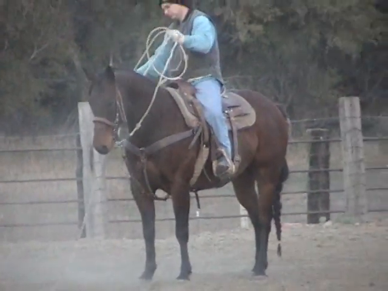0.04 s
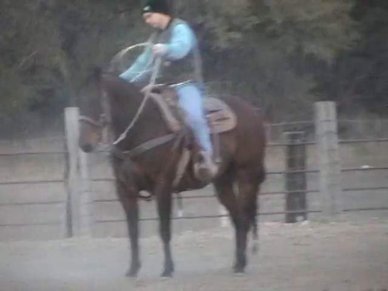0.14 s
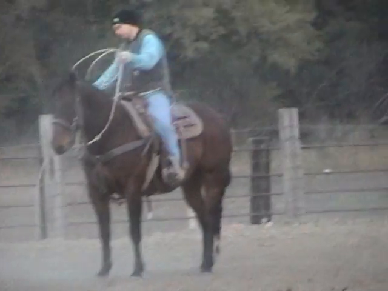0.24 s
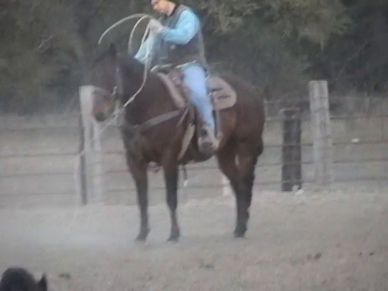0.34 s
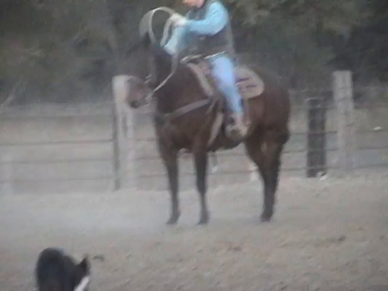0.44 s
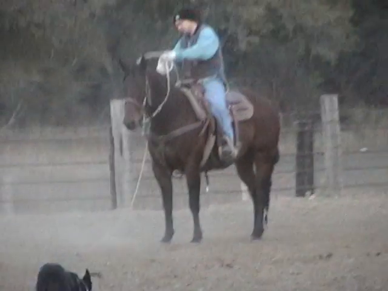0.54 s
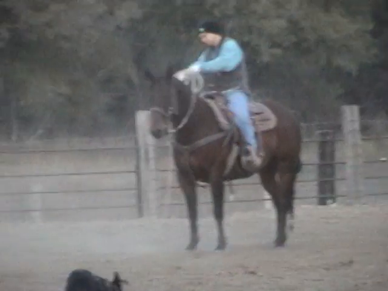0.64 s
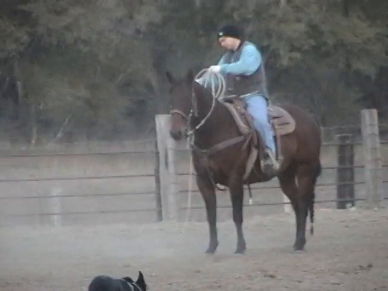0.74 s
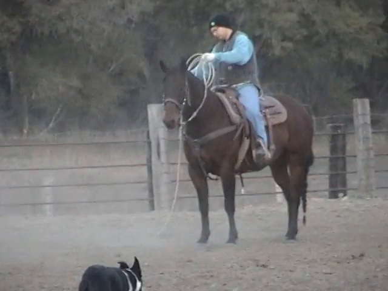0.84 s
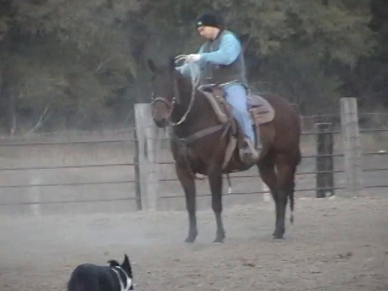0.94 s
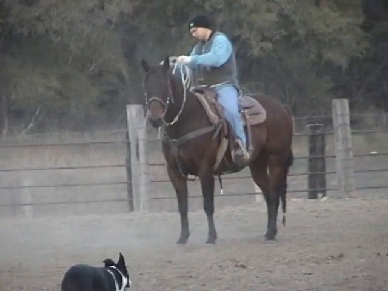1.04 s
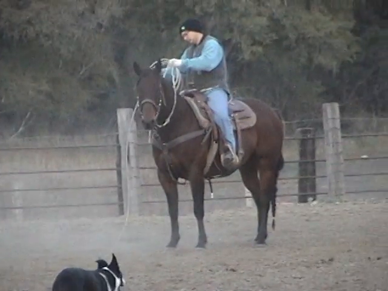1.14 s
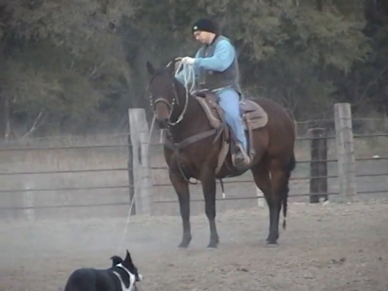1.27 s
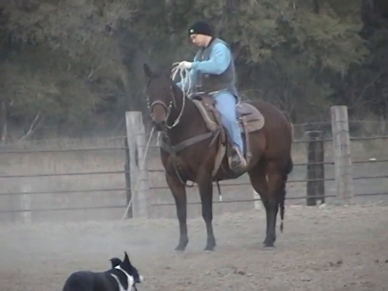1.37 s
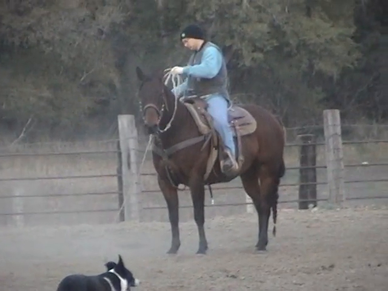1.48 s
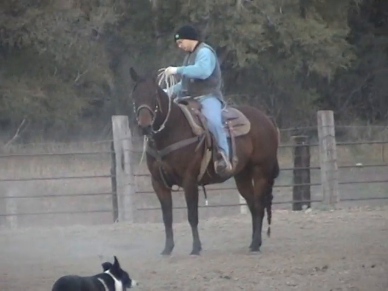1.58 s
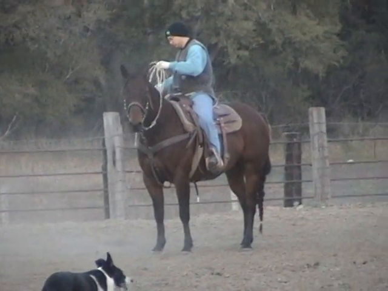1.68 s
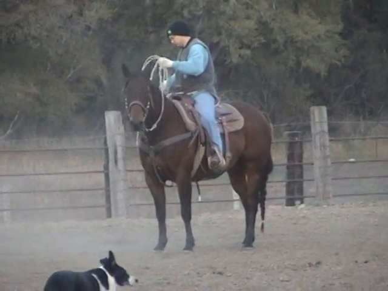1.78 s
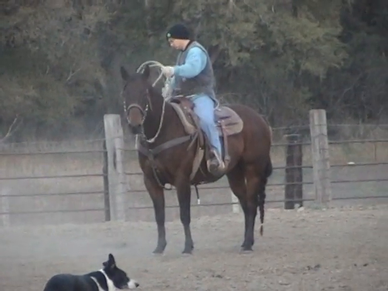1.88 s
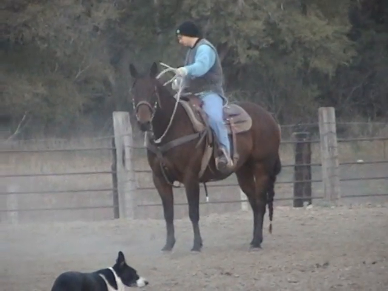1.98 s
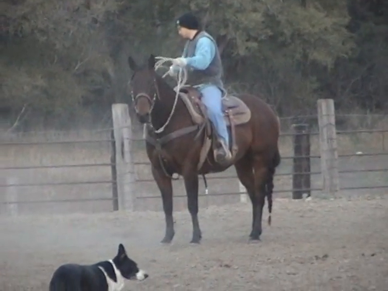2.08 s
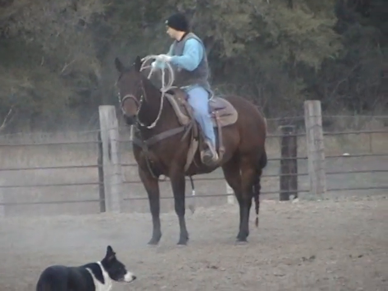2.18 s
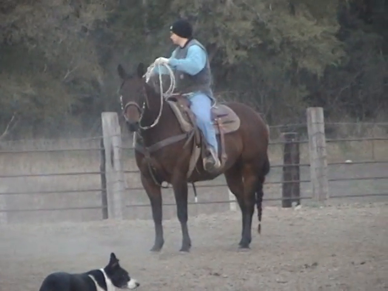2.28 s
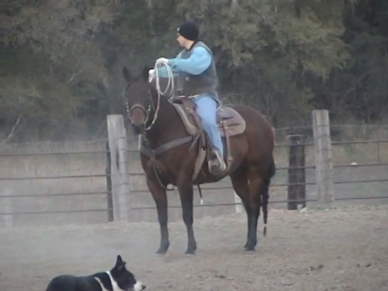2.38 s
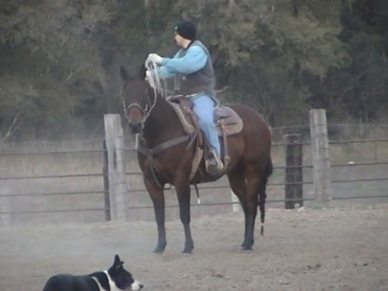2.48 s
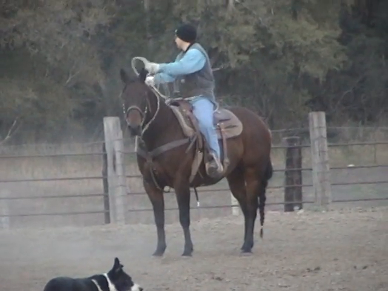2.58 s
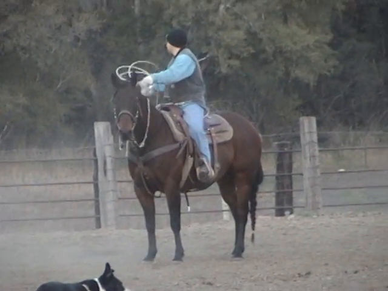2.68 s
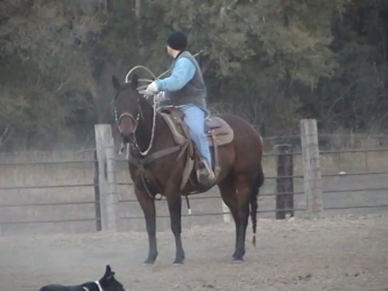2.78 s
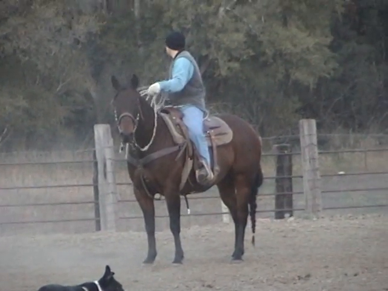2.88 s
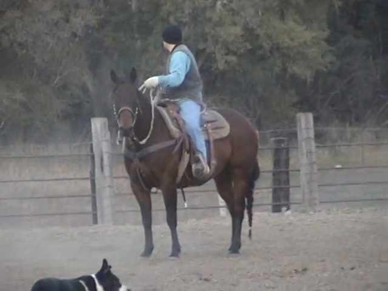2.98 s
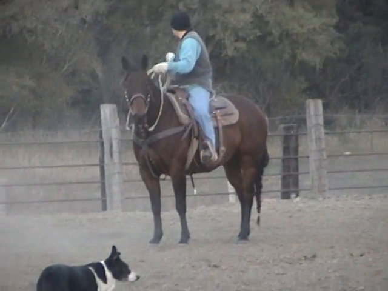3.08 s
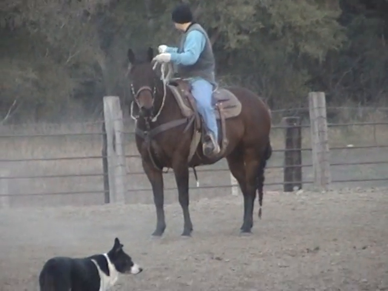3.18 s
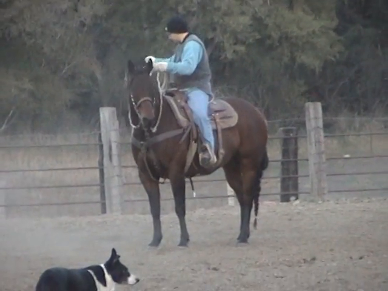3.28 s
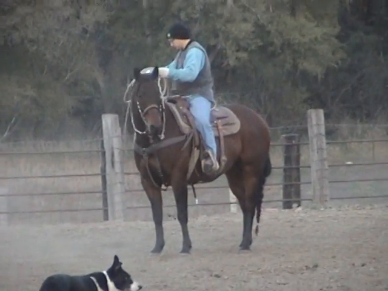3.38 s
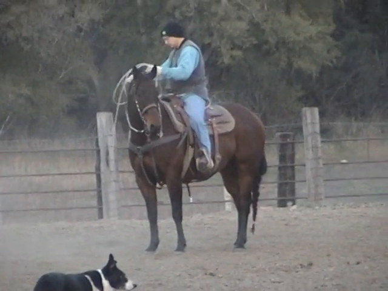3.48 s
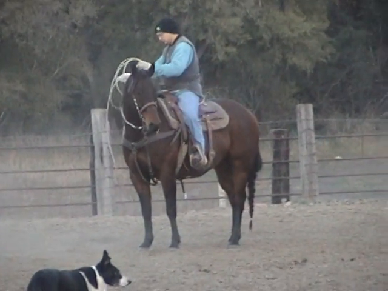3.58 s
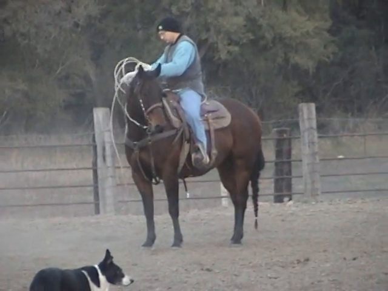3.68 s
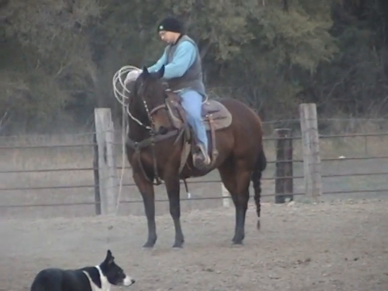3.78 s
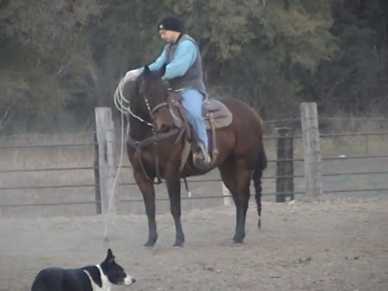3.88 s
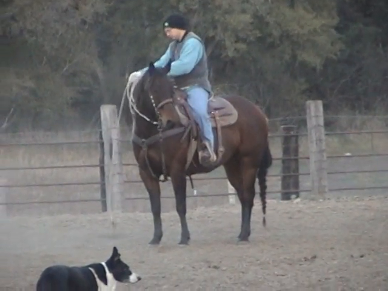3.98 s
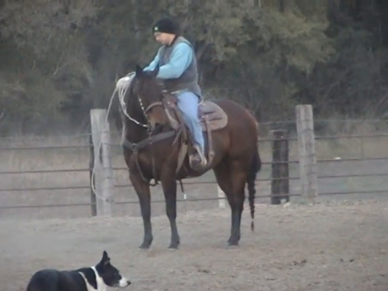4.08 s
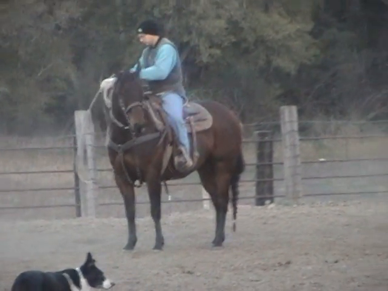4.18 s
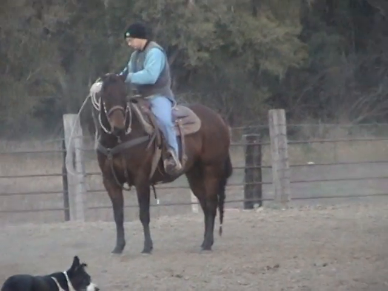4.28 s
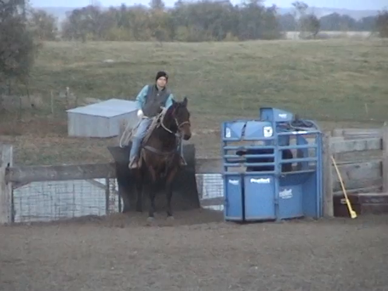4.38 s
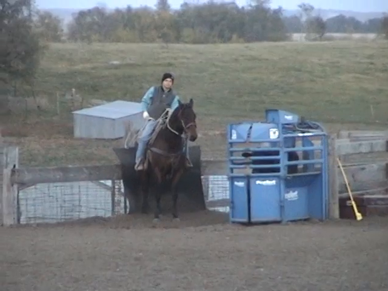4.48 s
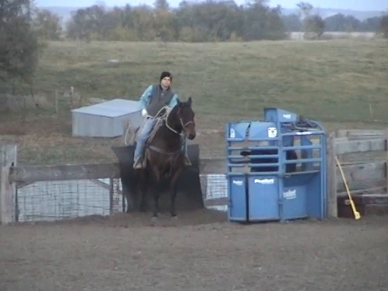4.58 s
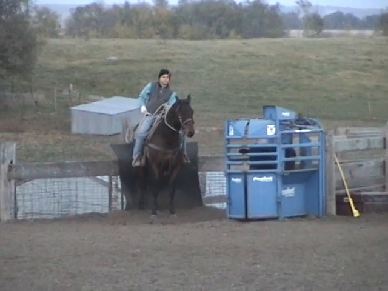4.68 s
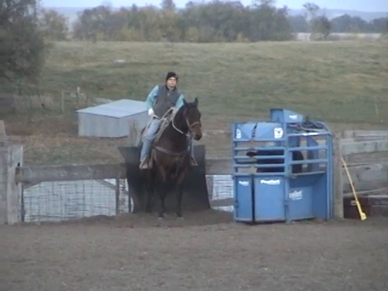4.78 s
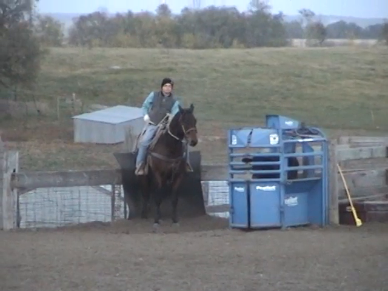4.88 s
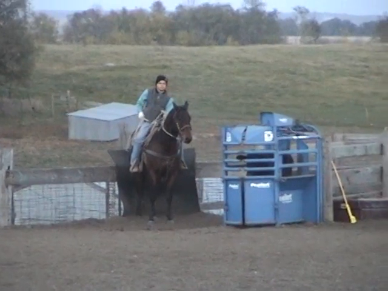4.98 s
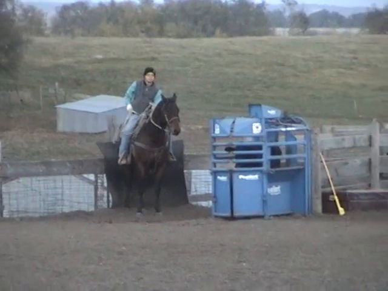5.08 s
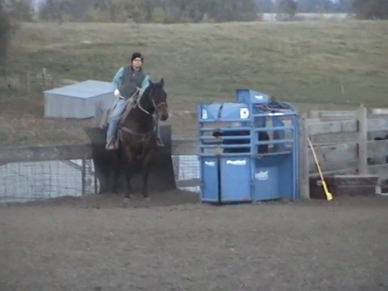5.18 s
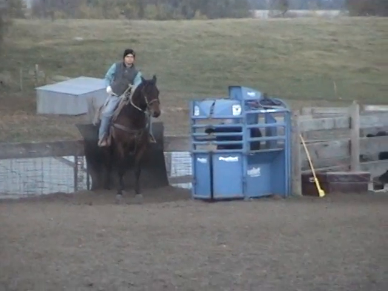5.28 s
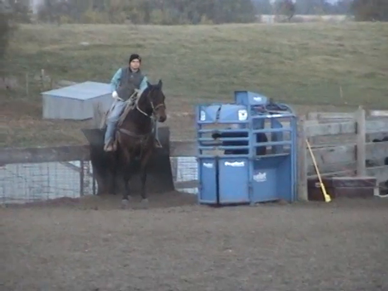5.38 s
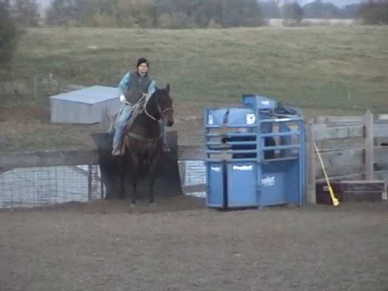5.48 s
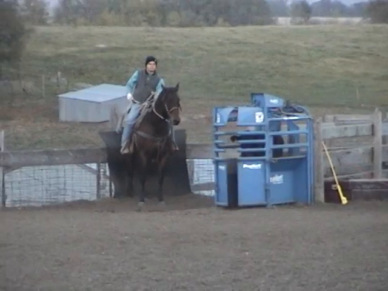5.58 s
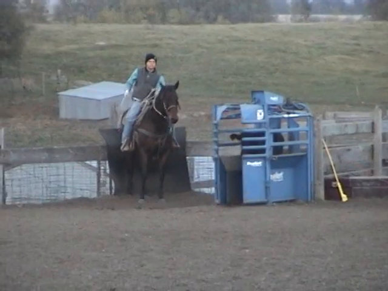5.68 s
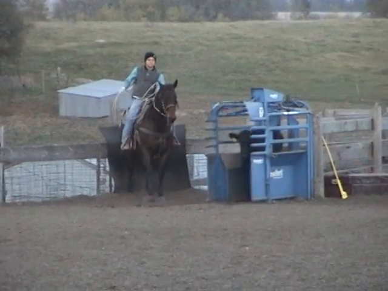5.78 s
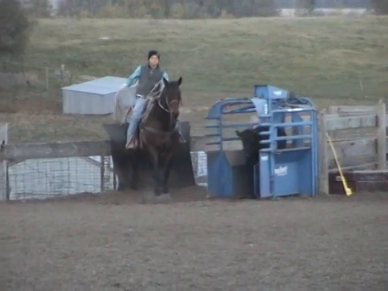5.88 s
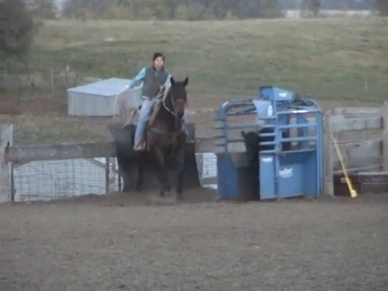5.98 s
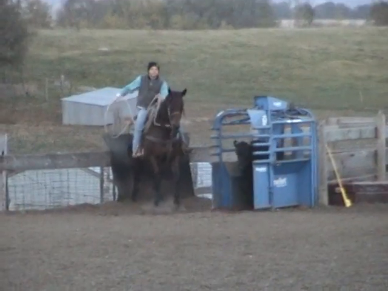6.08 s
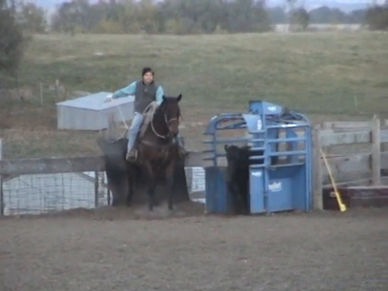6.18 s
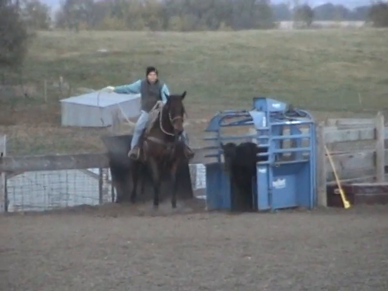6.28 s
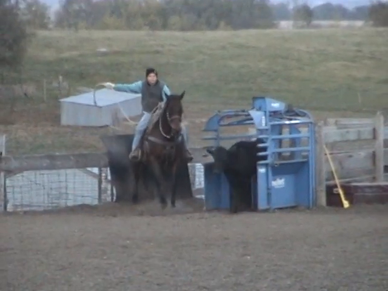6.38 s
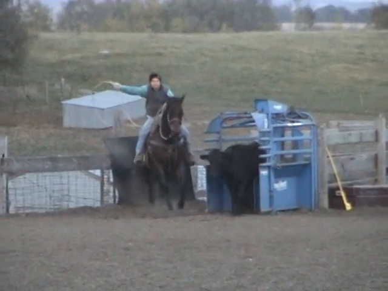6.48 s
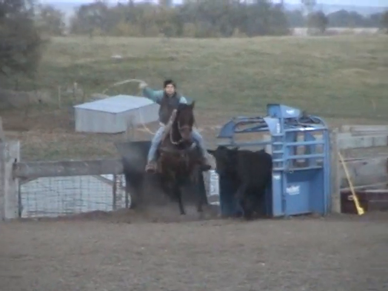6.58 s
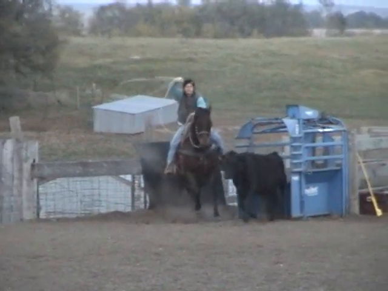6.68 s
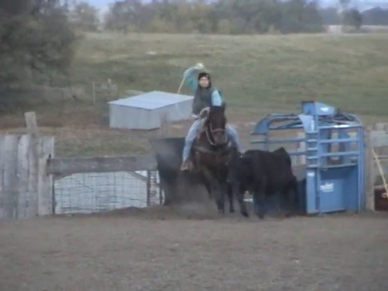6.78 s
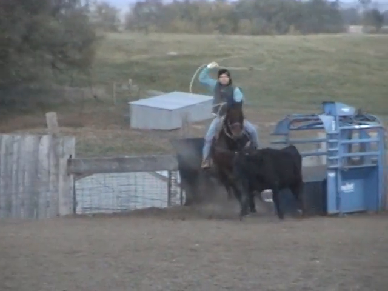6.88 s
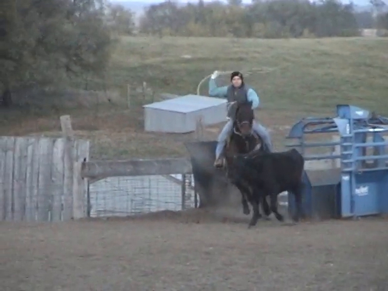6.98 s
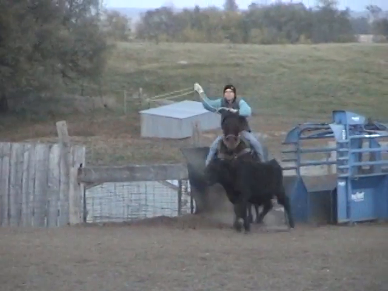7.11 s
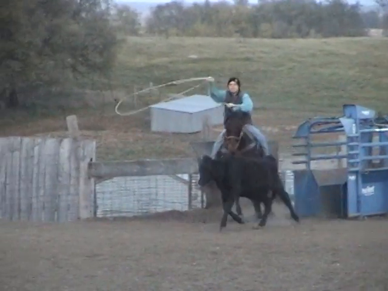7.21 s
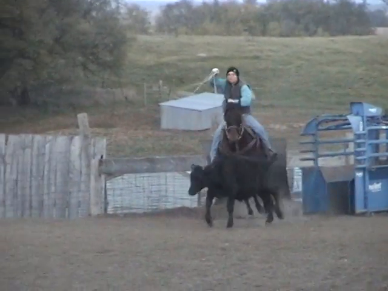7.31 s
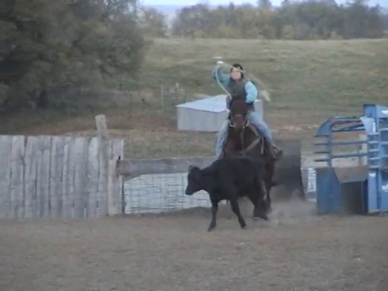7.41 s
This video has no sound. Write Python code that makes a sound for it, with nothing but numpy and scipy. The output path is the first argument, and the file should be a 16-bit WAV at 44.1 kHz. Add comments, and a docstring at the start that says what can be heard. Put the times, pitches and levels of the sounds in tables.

```python
"""First the whine and hiss of a tape camcorder's drive, close in both of its microphones, then hands on its body.
The place is a riding pen: across it a steel cattle chute bangs, rattles and booms, with light wind behind.
Blows shake noise through steel and panel resonances; knocks ring the camera's shell modes. The drive is paired
beating bearing tones plus hiss that partly repeats; both switch colour at the cut to a second shot.
"""
import sys
import numpy as np
from scipy import signal
from scipy.fft import rfft, irfft, next_fast_len
from scipy.io import wavfile
from scipy.ndimage import map_coordinates

SR = 44100
rng = np.random.default_rng(int(sys.argv[2]) if len(sys.argv) > 2 else 0)


def to_wav(sig):
    """Store sig (one row per channel, or 1-D mono) as 16-bit WAV at the path in sys.argv[1].

    Samples outside -1..1 are clipped; the rate is SR.
    """
    pcm = np.clip(np.atleast_2d(sig), -1, 1) * 32767
    pcm = np.round(pcm).astype(np.int16)
    wavfile.write(sys.argv[1], SR, pcm.T)  # frames by channels


N = 328545
TIME = np.arange(N) / SR
TOP_HZ = 15600  # band limit of the camera


def amp(db):
    """Decibels to amplitude."""
    return 10 ** (np.asarray(db) / 20)


def unit(x):
    """Scale to rms 1."""
    return x / np.sqrt(np.mean(x ** 2) + 1e-20)


def along(points, hz):
    """Read (f/Hz, value) points along a log frequency axis."""
    f, v = np.transpose(points)
    return np.interp(np.log(hz + 1), np.log(f + 1), v)


def curves(rows):
    """One value per sample for each column after the time."""
    s, *cols = np.transpose(rows)
    return [np.interp(TIME, s, c) for c in cols]


def wobble(rate):
    """A smooth random curve with rate knots a second."""
    knots = rng.standard_normal(int(N * rate / SR) + 4)
    return map_coordinates(knots, [TIME * rate])


def filtered(x, response):
    """Pass x through a complex response of frequency."""
    m = next_fast_len(N + SR // 2)
    return irfft(rfft(x, m) * response(np.fft.rfftfreq(m, 1 / SR)), m)[..., :N]


def resonant(modes):
    """The causal response of (f/Hz, width/Hz, level/dB) resonances with alternating signs."""
    def response(f):
        return sum((-1) ** k * amp(db) * 1j * f * width / (centre ** 2 - f * f + 1j * f * width)
                   for k, (centre, width, db) in enumerate(modes))
    return response


def spread(pair, colour, alike, lean):
    """Mix two unrelated signals into a coloured stereo pair of rms 1 with a set left-right likeness."""
    m = next_fast_len(N + SR // 2)
    hz, (a, b) = np.fft.rfftfreq(m, 1 / SR), rfft(pair, m)
    turn = np.arccos(np.clip(along(alike, hz), -1, 1)) / 2
    mid, side = np.cos(turn) * a, np.sin(turn) * b
    tilt = colour(hz) * amp(along(lean, hz) * np.array([[.5], [-.5]]))
    return unit(irfft(np.array([mid + side, mid - side]) * tilt, m)[:, :N])


def dying(s, db, t60, attack):
    """An envelope rising from s with time constant attack and falling 60 dB in t60, cut after 2 s."""
    out, start = np.zeros(N), round(s * SR)
    t = TIME[:min(N - start, 2 * SR)]
    out[start:start + len(t)] = amp(db - 60 * t / t60) * (1 - np.exp(-t / attack))
    return out


# blows of the gate and bars across the pen; from 7.2 s a faint bright swell, perhaps a creak:
# t/s, steel level/dB, treble level/dB, boom level/dB
BLOWS = [(5.596, -53, -35, -45), (5.621, -41, -54, -40.5), (5.646, -34, -31, -45), (5.658, -27, -33.5, -41),
         (5.689, -33, -35, -54), (5.751, -37, -48, -47), (5.993, -22.5, -27, -34.5),
         (6.03, -29, -29.5, -24), (6.047, -21.5, -22, -37), (6.094, -24.5, -24, -25),
         (6.122, -33, -26.5, -47), (6.157, -28, -27.5, -50), (6.209, -30.5, -32, -40),
         (6.269, -36, -36, -44), (6.327, -35, -42.5, -82), (6.487, -36, -40.5, -42),
         (6.528, -33, -39.5, -46), (6.586, -31.5, -34.5, -31.5), (6.542, -32.5, -39, -38),
         (6.604, -36, -33.5, -50), (6.711, -35.5, -43, -54), (6.779, -47, -51, -44), (7.234, -63, -47, -49),
         (7.29, -71, -48, -57), (7.37, -56, -56, -49)]
# left-right likeness of the chute at the two microphones: f/Hz, likeness
CHUTE_ALIKE = [(60, 0.99), (130, 1), (290, 0.99), (640, 1), (1410, 0.89), (3100, 0.98), (6820, 0.99),
               (15000, 0.77)]
# left over right microphone for the chute: f/Hz, level/dB
CHUTE_LEAN = [(60, 9), (110, 2.5), (200, 4.5), (380, 3), (700, 2.5), (1290, 2), (2380, 0.5), (4400, 0),
              (8120, 1), (15000, 2)]


def chute():
    """Each blow rings the steel, sets loose bars rattling, booms in the side panels and sounds the bars' notes."""
    return rattle() + boom() + pin() + clang()


# rattle as it arrives at the camera: f/Hz, level/dB per Hz
STEEL = [(280, -26), (480, -10.5), (742, -0.5), (1130, -4), (1560, 0), (1770, -4.5), (3040, -1.5),
         (4900, -7), (6190, -6.5), (8150, -12.5), (9990, -27), (11400, -29.5), (15400, -62)]
# resonances of the steel bars: f/Hz, width/Hz, note level/dB (before a chance strength)
BARS = [(1060, 230, 0), (1564, 39, 0), (2990, 8.8, -2), (4220, 19, -6), (6170, 100, -7), (5900, 33, -6),
        (7400, 69, -12), (7430, 250, -13), (7560, 80, -13)]
RING_T60, TREBLE_T60, CRACK_T60, CRACK_DB = 0.12, 0.33, 0.02, 0  # s, s, s, dB: first ring, crack of contact
RATTLE_DB, RATTLE_T60, RATTLE_TREBLE_T60, RATTLE_RISE_S = -5.5, 0.73, 0.39, 0.013  # loose bars shake on
GRAIN_DB, CLUMP_DB = 1.2, .7  # weights of the small contacts' unevenness, fast and in clumps


def rattle():
    """Dense small contacts, as noise, ring the steel; powers of all blows add."""
    body, edge = np.zeros((2, N))
    for s, db, treble_db, _ in BLOWS:
        body += dying(s, db, RING_T60, attack=0.00028) ** 2
        body += dying(s, db + RATTLE_DB, RATTLE_T60, RATTLE_RISE_S) ** 2
        edge += dying(s, treble_db, TREBLE_T60, attack=0.0034) ** 2
        edge += dying(s, treble_db + CRACK_DB, CRACK_T60, attack=0.0018) ** 2
        edge += dying(s, treble_db + RATTLE_DB, RATTLE_TREBLE_T60, RATTLE_RISE_S) ** 2
    unevenness = amp(GRAIN_DB * wobble(300) + CLUMP_DB * wobble(60))
    contacts = rng.standard_normal((2, 2, N)) * unevenness
    bars = resonant([(centre, width, 0) for centre, width, _ in BARS])
    steel = lambda hz: amp(along(STEEL, hz)) * (1 + bars(hz))
    upper = lambda hz: 1 / np.sqrt(1 + (2300 / (hz + 1)) ** 6)  # splits steel from treble
    low = spread(contacts[0], lambda hz: steel(hz) * np.sqrt(1 - upper(hz) ** 2), CHUTE_ALIKE, CHUTE_LEAN)
    high = spread(contacts[1], lambda hz: steel(hz) * upper(hz), CHUTE_ALIKE, CHUTE_LEAN)
    return np.sqrt(body) * low + np.sqrt(edge) * high


# side panels, largest first; the summed response is then squared: f/Hz, width/Hz, level/dB (before squaring)
PANELS = [(85, 38, -6), (126, 17, -1), (159, 48, -5), (216, 19.2, -1.5), (233.6, 8.1, 1.5),
          (270.4, 44, -5.5), (345, 83, -10)]
BOOM_T60, BOOM_RISE_S = 1.29, 0.055  # the panels answer slowly
THUD_DB, THUD_T60 = 0, 0.26  # the panels' first jolt
DEEP_DB, DEEP_T60, DEEP_RISE_S = -8, 1.62, 0.014  # the two largest panels hum on longer


def boom():
    """Noise through the panel resonances swells slowly after each blow's thud and hums on."""
    swell, deep = np.zeros((2, N))
    for s, _, _, boom_db in BLOWS:
        swell += dying(s, boom_db, BOOM_T60, BOOM_RISE_S) ** 2
        swell += dying(s, boom_db + THUD_DB, THUD_T60, attack=.003) ** 2
        deep += dying(s, boom_db + DEEP_DB, DEEP_T60, DEEP_RISE_S) ** 2
    large, panels = (spread(rng.standard_normal((2, N)), lambda hz: resonant(modes)(hz) ** 2,
                            CHUTE_ALIKE, CHUTE_LEAN)
                     for modes in np.split(PANELS, [2]))
    return np.sqrt(swell) * panels + np.sqrt(deep) * large


# clinks of a loose pin: t/s, level/dB, t60/s
CLINKS = [(6.501, -26, 0.018), (7.238, -52, 0.041)]
PIN_HZ = 4400


def pin():
    """A loose pin clinks as a short tone of unsteady phase, equal in both microphones."""
    return sum(dying(s, db, t60, attack=0.00044) * np.sin(2 * np.pi * PIN_HZ * TIME + wobble(300))
               for s, db, t60 in CLINKS)


CLANG_DB = -7.5  # the bars' own notes under each blow


def clang():
    """Every blow sounds the bars' notes anew as decaying sines, each at a chance strength."""
    out, t = np.zeros(N + SR), TIME[:SR // 5]
    hz, width, level_db = np.transpose(BARS)[:, :, None]
    chances = rng.standard_normal((len(BLOWS), len(BARS), 1))
    for (s, db, _, _), chance in zip(BLOWS, chances):
        notes = amp(level_db + 3 * chance) * np.exp(-np.pi * width * t) * np.sin(2 * np.pi * hz * t)
        out[round(s * SR):][:len(t)] += amp(db + CLANG_DB) * notes.sum(axis=0) * (1 - np.exp(-t / 0.0021))
    return out[:N] * amp([[.5], [-.5]])  # left a little louder


# hands on the camera body, at the microphones: t/s, level/dB, thump level/dB re knock, tick level/dB re knock,
# f/Hz favoured by the spot struck, share felt oppositely by the two microphones
KNOCKS = [(.157, -33.5, -32, -17, 596, .9), (.17, -33.5, -32, -17, 794, .9),
          (0.185, -34, -32, -13, 1500, .9), (0.247, -41, -30, -30, 452, 0.6),
          (0.403, -27.5, -30, -14, 388, 0.75), (0.407, -22.5, -32, -10, 730, .9),
          (0.427, -26, -25, -8, 1300, 0.94), (0.432, -19, -26, -19, 705, 1),
          (0.451, -31.5, -20, -23, 450, 0.54), (0.48, -37.5, -22, -23, 273, 0.43),
          (.655, -24.5, -42, -15, 860, 0.79), (0.799, -35, -7, -33, 300, .1),
          (1.5, -41.5, -9, -33, 220, .1), (1.543, -34, -17, -33, 450, .1),
          (4.218, -35, -28, -23, 700, 0.82)]
# modes of the camera shell: f/Hz, width/Hz
SHELL = [(190, 58), (300, 88), (430, 146), (560, 136), (760, 270), (1000, 280), (1250, 210), (1900, 240)]
SCUFF_DB, SCUFF_T60, SCUFF_HZ = -23.5, 0.12, 500  # the hand slides on, the longer the lower the spot sounds


def knocks():
    """A touch rings the shell modes near its spot and scuffs on; it also pushes the microphones and may tick."""
    shell, tick, t = np.zeros((2, N)), np.zeros(N), TIME[:SR // 5]
    hz, width = np.transpose(SHELL)[:, :, None]
    sign = (-1) ** np.arange(len(SHELL))[:, None]  # neighbouring modes swing oppositely
    for s, db, thump_db, tick_db, spot_hz, opposed in KNOCKS:
        scuff_db = SCUFF_DB - 60 * t / SCUFF_T60 * np.sqrt(spot_hz / SCUFF_HZ)
        scuff = rng.standard_normal(len(t)) * amp(scuff_db)
        scuff[0] = 1  # the blow itself
        swing = sign * amp(-12 * np.log2(hz / spot_hz) ** 2) * np.exp(-np.pi * width * t)
        alike = np.sum(swing * np.sin(2 * np.pi * hz * t), axis=0)
        apart = np.sum(swing * np.sin(2 * np.pi * (hz * t + rng.random(hz.shape))), axis=0)
        apart *= opposed * (1 - np.exp(-t / 0.00034))
        ring = signal.fftconvolve(scuff[None], [alike + apart, alike - apart], axes=1)[:, :len(t)]
        push = amp(thump_db - 60 * t / 0.13) * np.sin(2 * np.pi * 35 * t)
        shell[:, round(s * SR):][:, :len(t)] += amp(db) * (ring + push)
        tick += dying(s, db + tick_db, .02, attack=.0003)
    tick_mode = resonant([(3300, 4500, 0)])
    high = unit(filtered(rng.standard_normal(N), lambda f: tick_mode(f) ** 2 / (1 + (f / 8500) ** 6)))
    return (shell + tick * high) * amp([[-.8], [.8]])  # right a little louder


# bearing tones in each shot, close to the microphones: multiple of the cage rate, multiple of shaft minus cage
# rate, first bearing level/dB rms, second bearing level/dB rms, left-right level/dB, left lead/rad
ORDERS_FIRST = [(0, 24, -66, -76, -8, -2.1), (48, 0, -61, -68, -3, -2.6), (49, 0, -66, -73, -1, -2.5),
                (60, 0, -63, -66, -11, 2.5), (72, 0, -66, -58, 15, 1.4), (78, 0, -67, -70, -3, -1.4),
                (84, 0, -68, -67, -1, -0.6), (0, 48, -69, -74, -5, -1.9), (90, 0, -66, -70, -1, -2.2),
                (96, 0, -71, -65, -12, 1.4), (0, 54, -50, -61, -6, 0.9), (102, 0, -61, -60, -6, 0.1),
                (107, 0, -68, -76, -2, 0.5), (108, 0, -52, -54, 0, 0.6), (109, 0, -72, -64, 2, 0.4),
                (0, 60, -57, -60, 2, 0.5), (114, 0, -53, -67, 0, -0.1), (115, 0, -76, -66, 1, -0.0),
                (0, 66, -67, -83, 0, -2.3), (126, 0, -75, -63, -2, -0.4), (0, 72, -63, -70, 3, -1.6),
                (132, 0, -62, -69, 2, -1.5), (0, 78, -62, -76, -1, -0.2), (144, 0, -62, -68, -1, -0.3),
                (150, 0, -68, -70, -3, -0.5), (0, 84, -80, -67, -6, -0.9), (181, 0, -80, -67, -1, -0.1),
                (0, 114, -67, -75, 0, -0.2), (-1, 120, -65, -87, 0, -0.0), (223, 0, -67, -78, 0, -0.0),
                (-1, 132, -62, -80, -1, -0.4), (0, 211, -76, -84, 0, -0.1), (0, 223, -76, -82, -6, -0.5),
                (0, 229, -72, -81, 0, 0.3)]
ORDERS_SECOND = [(42, 0, -67, -80, -2, -2.7), (0, 24, -63, -74, -3, 0.9), (48, 0, -65, -75, -7, -2.1),
                 (54, 0, -63, -72, -5, -2.2), (60, 0, -67, -70, 2, 2.6), (72, 0, -68, -65, 12, 0.8),
                 (0, 42, -66, -72, -9, -2.1), (78, 0, -63, -69, -10, -1.6), (84, 0, -69, -69, 2, -1.3),
                 (0, 48, -66, -72, -20, 0.7), (90, 0, -63, -69, -10, -1.3), (96, 0, -71, -65, -12, 0.1),
                 (0, 54, -51, -66, -4, 0.1), (102, 0, -57, -60, -4, -0.6), (108, 0, -54, -58, 0, 0.8),
                 (0, 60, -57, -60, 0, 0.4), (110, 0, -66, -82, 0, 0.2), (114, 0, -55, -70, 2, -0.0),
                 (120, 0, -67, -74, 5, -0.2), (0, 66, -60, -78, 4, -0.7), (126, 0, -77, -65, 2, -1.5),
                 (0, 72, -60, -69, -5, -1.3), (132, 0, -58, -68, -5, -1.3), (138, 0, -69, -74, -3, -0.6),
                 (0, 78, -68, -80, -6, 0.2), (144, 0, -62, -71, -5, -0.1), (150, 0, -67, -73, 1, -0.3),
                 (204, 0, -65, -82, 3, -0.5), (216, 0, -68, -85, 1, -0.5), (-1, 120, -73, -68, -1, -0.2),
                 (222, 0, -64, -79, 0, -0.4), (0, 210, -77, -90, 4, -0.9), (0, 216, -75, -80, 4, -1.1),
                 (0, 222, -77, -82, 3, -0.7), (0, 223, -79, -79, 5, -0.6)]
# steady tones off the bearings' grid in each shot: f/Hz, level/dB rms, left-right level/dB, left lead/rad
STRAY_FIRST = [(1314.1, -68, -6, -2.6), (2687.5, -64, -5, .2), (2911.5, -66, 3, .5), (3358.3, -67, -1, -.4),
               (6323.7, -67, -2, -.3)]
STRAY_SECOND = [(1091.8, -56, -4, 3.1), (1144.8, -63, 1, -2.7), (2459.8, -68, -11, -.1),
                (2683.4, -62, -3, -.4), (2686.6, -63, -3, -.5), (5786.9, -65, 0, -.3),
                (6234.7, -65, 0, -.3), (6322.4, -64, 0, -.4)]
# ball cages in each shot: f/Hz (cage turns a second), f/Hz by which the second cage turns faster
CAGE_FIRST = (26.45873, .01775)
CAGE_SECOND = (26.46167, .0129)
# hiss of the mechanism in each shot: f/Hz, level/dB per Hz
HISS_FIRST = [(410, -51), (700, -16), (1000, -17.5), (1600, -6.5), (2500, -13), (3200, -13.5),
              (5100, -18.5), (7300, -16), (9300, -29.5), (12000, -33), (15000, -47), (15600, -70)]
HISS_SECOND = [(410, -29), (700, -22.5), (1000, -11.5), (1600, -12.5), (2500, -16.5), (3200, -15),
               (4800, -16.5), (7300, -18.5), (9300, -31), (12000, -37.5), (15000, -47), (15600, -70)]
# case resonances lifting the hiss in each shot: f/Hz, width/Hz, level/dB over the hiss (powers add)
CASE_FIRST = [(1119, 58, 13), (2410, 30, 10), (2723, 27, 17), (2980, 160, 5), (3322, 13, 12),
              (3780, 33, 13), (4060, 110, 10.5), (4510, 780, 4.5), (5620, 97, 14.5), (5900, 120, 10),
              (6425, 206, 10), (6900, 560, 3.5), (10470, 710, 12.5), (11100, 270, 9.5), (13200, 500, 7)]
CASE_SECOND = [(850, 72, 3.3), (1570, 230, 0.75), (2360, 90, 1.4), (2560, 25, 9.5), (3000, 170, 6.5),
               (3800, 34, 1.7), (4060, 65, 6.8), (5440, 120, 3.8), (5810, 250, 4.7), (6345, 550, 7.9),
               (6930, 150, 2.5), (10700, 1030, 11), (10540, 230, 5.1), (13200, 500, 8)]
LAG_FIRST, LAG_SECOND = .058, .0724  # turns by which the second cage trails at time 0
CHANGE_S = 4.39  # cut to a second shot: the whine and hiss switch


def motors():
    """The whine and hiss of the tape drive, crossfaded in 14 ms from the first shot to the second."""
    share = np.clip((TIME - CHANGE_S) / 0.014 + .5, 0, 1)
    first, second = np.sqrt(1 - share), np.sqrt(share)
    whine = tones(ORDERS_FIRST, STRAY_FIRST, CAGE_FIRST, LAG_FIRST, first)
    whine += tones(ORDERS_SECOND, STRAY_SECOND, CAGE_SECOND, LAG_SECOND, second)
    noise = first * hiss(HISS_FIRST, CASE_FIRST, db=-46.5, repeat=0.79)
    noise += second * hiss(HISS_SECOND, CASE_SECOND, db=-47, repeat=0.81)
    return whine + noise


DRUM_HZ = 74.925  # turns a second of the drum shaft, which runs in two six-ball bearings
SCATTER_RAD = 1.4  # random spread of the tones' starting phases, which softens the pulsing


def tones(orders, stray, cage, lag, heard):
    """Each pair of bearing tones beats: the second is inverted, its cage a little faster, so it lies just off."""
    out, ear, t = np.zeros((2, N)), np.array([[.5], [-.5]]), TIME[heard > 0]
    cage_hz, faster_hz = cage
    ahead = faster_hz * t - lag  # turns of the second cage ahead of the first
    waves = []
    for m, n, one_db, two_db, pan_db, lead in orders:
        hz = m * cage_hz + n * (DRUM_HZ - cage_hz)
        # the second tone lies slightly above (m > n) or below (m < n)
        beating = amp(one_db) - amp(two_db) * np.exp(2j * np.pi * (m - n) * ahead)
        waves.append((hz, beating, pan_db, lead))
    waves += [(hz, amp(db), pan_db, lead) for hz, db, pan_db, lead in stray]
    for hz, size, pan_db, lead in waves:
        gain = amp(pan_db * ear)
        # each passing ball is a small blow: its tones start loosely together
        start = SCATTER_RAD * rng.standard_normal()
        wave = size * np.exp(2j * np.pi * hz * t + 1j * start)
        stereo = np.real(gain * np.exp(1j * lead * ear) * wave)
        out[:, heard > 0] += np.sqrt(2 / np.mean(gain ** 2)) * stereo
    return out * heard


# left-right likeness of hiss and open air at the microphones: f/Hz, likeness
ALIKE = [(60, 0.45), (130, 0.47), (290, 0.24), (640, 0.22), (1410, -0.19), (3100, 0.61), (6820, 0.88),
         (15000, 0.52)]
# left over right microphone for hiss and open air: f/Hz, level/dB
LEAN = [(60, 2), (110, 0.5), (200, 1.5), (380, 0), (700, -0.5), (1290, -3), (2380, 1.5), (4400, -2),
        (8120, -1), (15000, 2.5)]
TICK_HZ = 158.77  # six balls pass for each turn of the cage


def hiss(spectrum, case, db, repeat):
    """Bearing and tape noise in the case; a share of its power repeats, the rest pulses as the balls pass."""
    repeat = np.clip(repeat, 0, 1)
    pulsing = unit((1 + 1.13 * np.cos(2 * np.pi * TICK_HZ * TIME)) * rng.standard_normal((2, N)))
    pair = np.sqrt(repeat) * repeating(uneven_db=4.5) + np.sqrt(1 - repeat) * pulsing

    def colour(hz):
        lift = 1 + sum(amp(mode_db) ** 2 / (1 + (2 * (hz - centre) / width) ** 4)
                       for centre, width, mode_db in case)
        return amp(along(spectrum, hz)) * np.sqrt(lift)
    return amp(db) * spread(pair, colour, ALIKE, LEAN)


# two steady rates of the bearings at which the hiss repeats: f/Hz
REPEAT_HZ = [26.46, 24.232]
SIDE_HZ = .945  # spacing of the close lines around each multiple, which makes the hiss waver slowly


def repeating(uneven_db):
    """Noise that repeats at two steady rates of the bearings: close groups of lines of uneven size."""
    m = next_fast_len(N)
    lines = np.zeros((2, m // 2 + 1), complex)
    for hz in REPEAT_HZ:
        orders = np.arange(1, int(TOP_HZ / hz))[:, None]
        line_hz = orders * hz + np.arange(-2, 3) * SIDE_HZ
        bins = np.round(line_hz * m / SR).astype(int)
        size = amp(uneven_db * rng.standard_normal(orders.shape) + 4.7 * rng.standard_normal(bins.shape))
        lines[:, bins] += size * np.exp(2j * np.pi * rng.random((2,) + bins.shape))
    return unit(irfft(lines, m)[:, :N])


# open air and wind around the pen: f/Hz, level/dB per Hz
AIR = [(12, -48), (20, -17), (96, -0.5), (204, -6), (368, -3.5), (413, -4.5), (653, -1.5), (733, -8),
       (1000, -4), (1300, -63), (2200, -120)]
# level of the low background rush, higher while the chute sounds: t/s, level/dB
AIR_LEVEL = [(0.0, -49.5), (1.06, -52.5), (3.13, -52.5), (3.4, -54), (4.75, -51.5), (5.4, -54.5),
             (6.3, -45), (7.1, -52), (7.45, -48.5)]


def air():
    """Light wind and far country noise: coloured noise whose strength wavers in small lumps."""
    lumps = amp(0.65 * np.array([wobble(9), wobble(7.2)]) + 1.25 * wobble(25))
    rush = spread(lumps * rng.standard_normal((2, N)), lambda hz: amp(along(AIR, hz)), ALIKE, LEAN)
    return amp(curves(AIR_LEVEL)[0]) * rush


def scene():
    """The chute across the pen, hands on the camera, its drive, and the open air."""
    return chute() + knocks() + motors() + air()


def record(dry):
    """The camera keeps nothing above its band limit."""
    return filtered(dry, lambda hz: hz < TOP_HZ)


dry = scene()
out = record(dry)
to_wav(out)
```